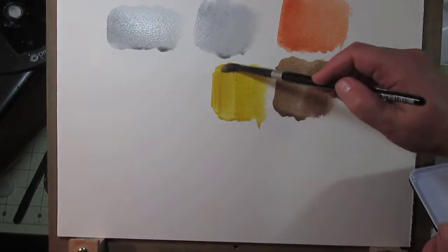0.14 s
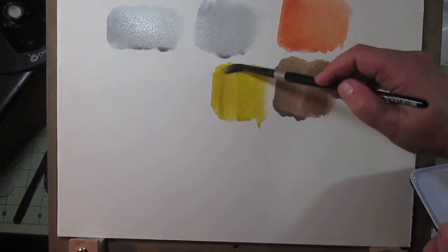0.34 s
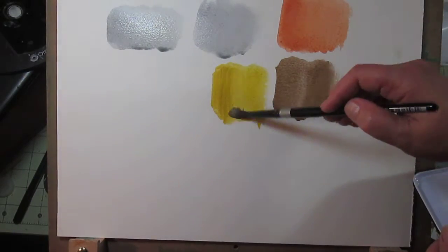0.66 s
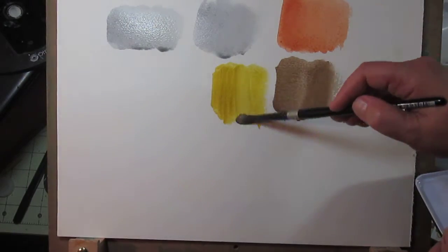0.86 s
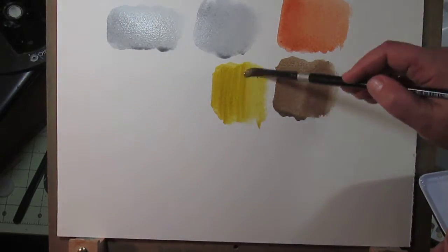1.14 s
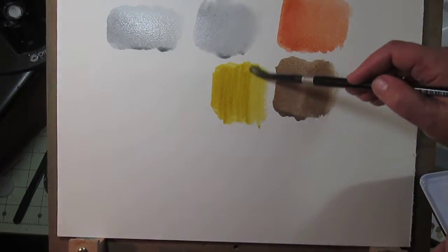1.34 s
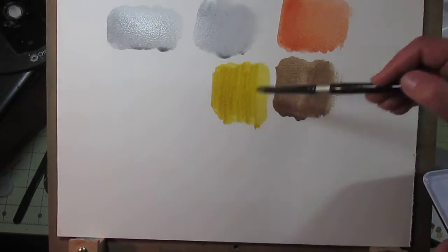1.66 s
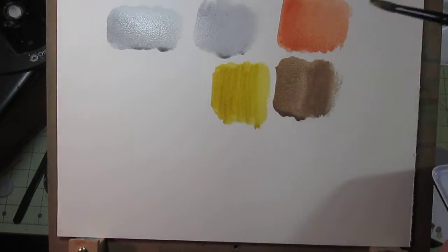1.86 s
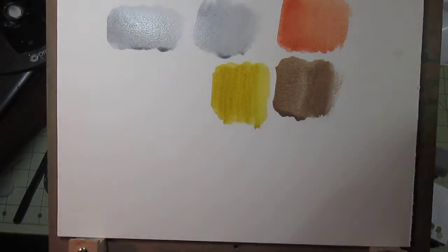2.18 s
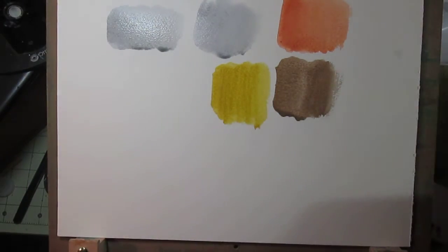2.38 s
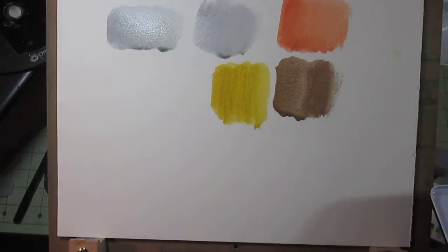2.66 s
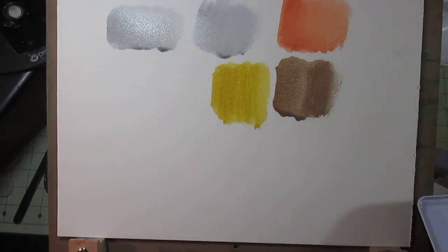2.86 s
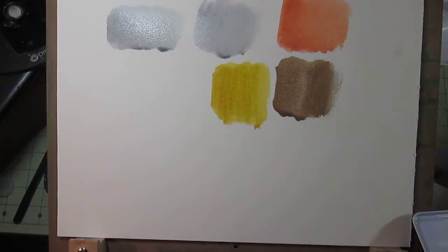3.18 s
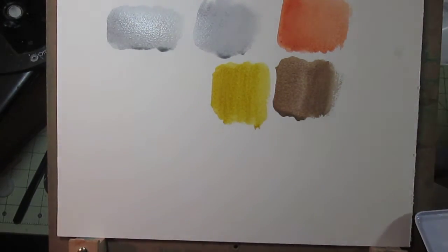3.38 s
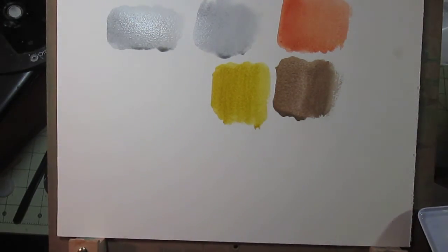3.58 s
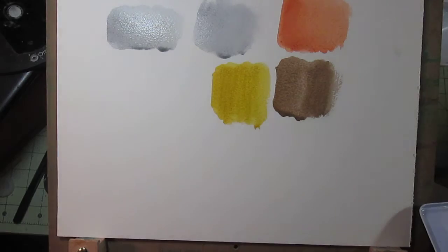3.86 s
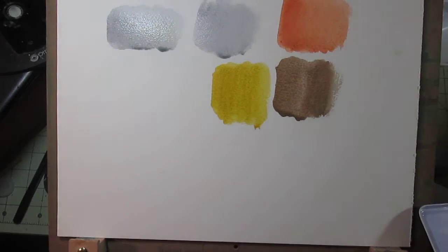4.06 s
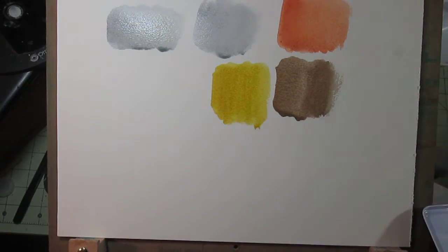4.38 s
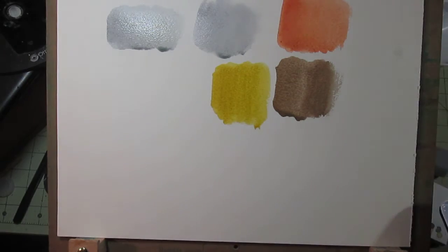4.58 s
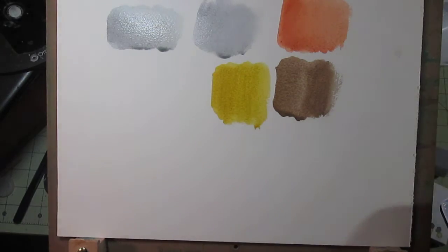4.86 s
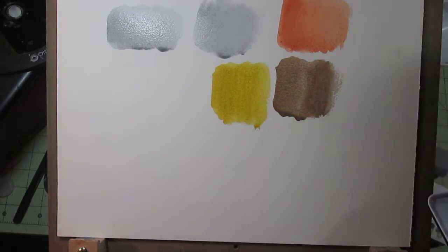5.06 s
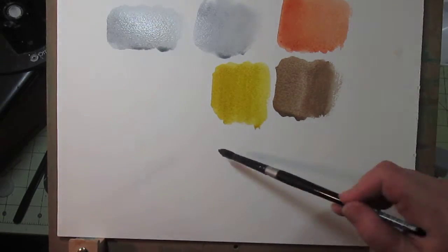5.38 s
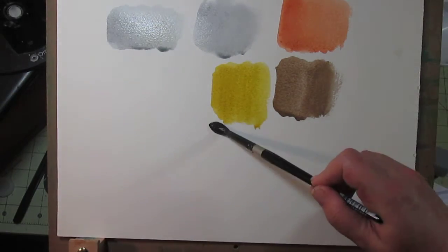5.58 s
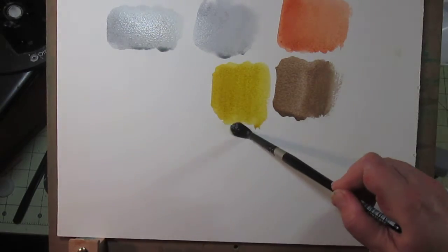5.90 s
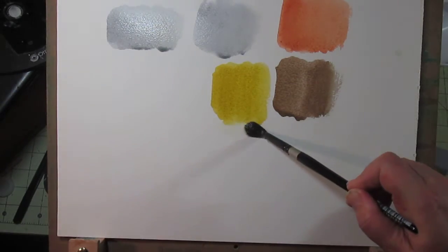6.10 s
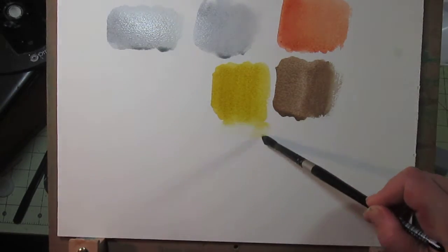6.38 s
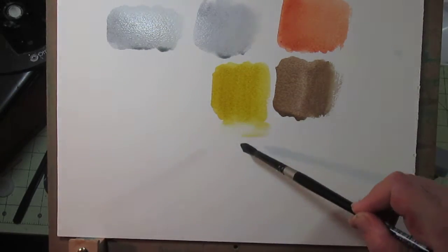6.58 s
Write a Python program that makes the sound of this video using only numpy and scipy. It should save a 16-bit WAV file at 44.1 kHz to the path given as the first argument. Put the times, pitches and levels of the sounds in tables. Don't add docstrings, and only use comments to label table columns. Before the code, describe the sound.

A small, quiet room heard through a camera microphone: soft air noise, low wavering machine hum around 50 Hz and a very faint, thin high whine throughout. From 0 to 1.05 s wet bristles brush paper in ten short, soft hisses, roughly one every tenth of a second, with one more flick at 1.6 s. Then only background until 2.9 s, when the brush plunges into a glass jar: a hard, bright clack at 2.94, a ringing clink at 3.18, a duller pair around 3.53 and 3.62, a low, longer knock at 3.93 and a light touch at 4.32. Between them, hollow gulps near 900-1000 Hz, rising bubble chirps and watery swirls, strongest around 3.2 and 3.6, with short room reflections. Tiny pops thin out until 5.2. Brief, faint motor buzzes occur occasionally. From 5.7 to 6.7 a hand slides dully on the board, with faint motor tone.

```python
import sys
import numpy as np
from scipy import signal
from scipy.fft import rfft, irfft, next_fast_len
from scipy.io import wavfile
from scipy.ndimage import uniform_filter1d

SR = 44100
rng = np.random.default_rng(int(sys.argv[2]) if len(sys.argv) > 2 else 0)


def waveform_to_disk(signal):
    frames = np.transpose(np.atleast_2d(signal))
    scaled = np.clip(frames, -1, 1) * 32767
    samples = np.round(scaled).astype(np.int16)
    wavfile.write(sys.argv[1], SR, samples)


def to_linear_factor(level_db):
    exponent = np.asarray(level_db, float) / 20
    return 10 ** exponent


N = 297409

# (time [s], crack level [dB], crack centre [Hz], crack t60 [s], ring level [dB])
KNOCKS = [
    (2.941, -4, 5260, 0.02, -35.5),
    (3.184, -15, 4020, 0.066, -32),
    (3.5303, -21, 3580, 0.064, -42),
    (3.6151, -9.5, 3200, 0.041, -37),
    (3.702, -32, 4000, 0.057, -42),
    (3.9324, -15, 2600, 0.084, -35),
    (4.317, -28, 3860, 0.042, -51),
]
# (time [s], level [dB], pitch
# [Hz], t60 [s])
CHINKS = [(2.9407, -20, 8120, 0.033), (2.9407, -17, 4800, 0.023), (2.9407, -38, 2696, 0.13),
          (2.9407, -27.5, 2210, 0.055), (3.1851, -22, 2605, 0.06), (3.189, -18.5, 2662, 0.05),
          (3.1851, -19, 2200, 0.02), (3.1851, -15.5, 4730, 0.011), (3.1851, -21, 6800, 0.011),
          (3.5294, -20, 2640, 0.032), (3.6152, -14.5, 3780, 0.025), (3.6152, -21.5, 568, 0.067),
          (3.618, -18, 947, 0.05), (3.704, -33.5, 2645, 0.036), (3.5294, -48.5, 3580, 0.33),
          (3.6152, -43.5, 3522, 0.33), (4.3166, -37, 3180, 0.023), (3.9319, -26.5, 3750, 0.034),
          (3.9319, -24, 706, 0.035), (3.9319, -33, 1133, 0.067), (3.9319, -53, 4320, 0.34),
          (3.9319, -41.5, 3565, 0.26), (3.97, -50.5, 424, 0.5), (3.9319, -49, 2900, 0.049),
          (4.3166, -50.5, 438, 0.23), (4.3166, -57, 899, 0.34), (2.9407, -24.5, 520, 0.038),
          (3.5294, -36, 549, 0.13)]
# (pitch [Hz], level [dB], t60 [s])
GLASS_MODES = [(440, -5, .3), (1505, 0, .4), (3112, -16, .3), (3521, -5, .27), (4330, -13, .25),
               (6218, -16, .2)]
THUD_OVER_RING_DB = 5.5
SNAP_DB, SNAP_T60_S = -16, 0.0028

# (time [s], peak level [dB], start pitch [Hz], swell [ms])
GULPS = [(2.934, -23, 930, 3.8), (2.992, -15, 850, 4.4), (3.056, -21, 937, 4.4), (3.065, -21, 895, 2.5),
         (3.174, -15.5, 852, 4.3), (3.258, -16.5, 990, 4.4), (3.286, -29, 990, 2.7),
         (3.315, -28.5, 853, 9.5), (3.344, -22.5, 843, 4.2), (3.445, -30.5, 910, 5), (3.467, -32, 886, 5.8),
         (3.501, -16.5, 985, 4.7), (3.512, -18.5, 1030, 7.5), (3.521, -19, 938, 6.1),
         (3.573, -33, 967, 7.8), (3.59, -18.5, 988, 5.1), (3.599, -30, 960, 14), (3.668, -25, 901, 5.9),
         (3.688, -28.5, 975, 1.9), (3.7, -39, 920, 6.8), (3.773, -31, 1115, 3.6), (3.982, -29, 1016, 6.5),
         (4.265, -28, 957, 5.8), (4.285, -35.5, 770, 4.6), (4.231, -43, 864, 4.5), (3.412, -49, 1010, 4.9)]
JAR_NOTE_HZ, PULL = 985, 0.82
# (time [s], peak level [dB], start pitch [Hz])
BLIPS = [(2.936, -24, 408), (2.99, -41, 544), (2.971, -35, 1567), (3.098, -28, 1640), (3.167, -39, 2610),
         (3.204, -26, 2545), (3.44, -35, 1390), (3.455, -39.5, 2060), (3.503, -35.5, 553),
         (3.508, -33, 2480), (3.576, -30.5, 1550), (3.588, -29.5, 550), (3.705, -34.5, 587),
         (3.798, -44.5, 2630), (3.49, -45, 2700), (3.901, -45, 1480), (3.974, -38, 2350),
         (4.082, -39, 1470), (4.131, -46, 2650), (4.268, -38.5, 1360), (4.269, -49, 2480)]
BLIP_GLIDE = 0.94
BLIP_SWELL_MS, BLIP_SHORTER = 6.1, 0.36
# (time [s], peak level [dB], start pitch [Hz], end pitch [Hz], swell [ms])
RISERS = [
    (2.953, -29, 383, 468, 15.4),
    (2.98, -26, 500, 900, 3.45),
    (3.0, -31, 1300, 1685, 8.6),
    (3.038, -43.5, 523, 810, 17),
    (3.08, -27.5, 1124, 1630, 7.6),
    (3.085, -29.5, 957, 1226, 7.1),
]
SWELL_POWER = 1.6

# (time [s], peak level [dB], pitch [Hz])
POPS = [(2.916, -40, 4370), (3.785, -53, 5750), (4.2577, -53, 4400), (4.6443, -58, 5170),
        (3.0395, -39.5, 12300), (3.0396, -43, 6600), (3.078, -54, 11000), (2.919, -56, 7300),
        (3.1742, -35, 5240), (3.1747, -43, 9000), (3.2713, -37.5, 6170), (3.3153, -53, 5600),
        (3.343, -37.5, 5640), (3.508, -46, 5300), (3.5814, -47, 12500), (3.594, -47, 7400),
        (3.763, -49.5, 5960), (3.824, -47, 7000), (3.908, -44, 7400), (4.1155, -51, 4810),
        (4.4428, -57, 7100), (4.4902, -56, 5010), (4.5276, -57, 5000), (4.671, -58, 5200),
        (4.7192, -57, 7450), (4.8494, -55, 3500), (4.9183, -53, 5160), (5.1864, -53.5, 6900)]
SETTLE_S = (3.95, 4.95)
SETTLE_DB, SETTLE_HZ = -60, 4970

# (time [s], level [dB])
STIR = [
    (2.935, -64),
    (2.991, -62),
    (3.13, -57),
    (3.195, -44),
    (3.42, -59),
    (3.6, -52),
    (3.86, -69),
    (4.1, -57),
    (4.4, -88),
]
# (time [s], level [dB], centre [Hz], t60 [s])
SLAPS = [(2.985, -42, 694, 0.037), (3.088, -67.5, 1970, 0.37), (3.168, -42, 1480, 0.033),
         (3.271, -69, 1800, 0.42), (3.441, -64, 1570, 0.48), (3.5, -48.5, 1297, 0.089),
         (3.576, -56, 1500, 0.056), (3.659, -52.5, 1300, 0.18), (3.76, -66, 1200, 0.081),
         (3.877, -67, 2860, .08), (3.901, -57, 1860, 0.058), (4.07, -64, 1900, 0.082),
         (4.083, -48.5, 1530, 0.031), (4.106, -72, 1200, 0.033), (4.13, -52.5, 1900, 0.087),
         (4.232, -56.5, 1590, 0.054), (4.266, -47, 1250, 0.085)]
# (centre [Hz], width [Hz], level [dB])
JAR_AIR = [(550, 97, -6.5), (960, 71, 5), (1410, 310, -5), (2600, 370, 2.5)]
SPRAY_DB, SPRAY_FOLLOWS = -65, 0.45

# (frequency [Hz], t60 [s])
ROOM = [(200, 0.37), (1500, 0.15), (6000, 0.16), (14000, 0.14)]

# (time of loudest moment [s], level [dB], length [s])
STROKES = [
    (.0, -59.5, 0.06),
    (.128, -64.5, 0.057),
    (.212, -60, 0.079),
    (.42, -58.5, 0.082),
    (.53, -63, 0.051),
    (.625, -56.5, 0.074),
    (.72, -67, 0.05),
    (.825, -59, 0.078),
    (.922, -62, 0.072),
    (1.025, -59.5, 0.057),
]
FLICK = (1.586, -56, 0.055)
# (frequency [Hz], density [dB per Hz])
BRISTLE = [(500, -40), (900, -3), (1500, 2), (2800, -6), (4800, 0), (7500, -6), (10000, -13), (15500, -23)]
STROKE_EDGE_DB = 15
CONTACT_DB, CONTACT_END_S = -80, 1.3
# (time [s], level [dB])
RUB = [
    (5.66, -70),
    (5.8, -57.5),
    (6.0, -61),
    (6.3, -64.5),
    (6.6, -61),
    (6.74, -75.5),
]

# (start [s], end [s], level [dB])
FOCUS = [
    (.0, 0.063, -78),
    (.96, 1.043, -76),
    (2.23, 2.32, -76.5),
    (3.837, 3.92, -75),
    (5.53, 5.586, -77),
    (5.755, 5.834, -75),
    (5.87, 5.9, -80),
]
MOTOR_HZ = 1376
MOTOR = [(1, -4), (2, 5), (4, 3), (6, 0), (7, 2), (8, -6)]
# (time [s], level [dB])
CREEP = [
    (5.68, -82),
    (5.704, -68.5),
    (5.818, -60),
    (5.866, -71),
    (5.968, -64),
    (6.312, -70),
    (6.442, -58.5),
    (6.666, -69),
    (6.68, -74),
]
# (pitch [Hz], rms level [dB])
WHINE = [(11793, -79), (11823, -92), (11853, -93), (11973, -97)]
# (centre [Hz], width [Hz])
NOTCHES = [(3931, 200), (7830, 80)]
TOP_HZ = 15830

# (frequency [Hz], density [dB per Hz])
AIR = [(60, -100), (90, -73.2), (130, -76.1), (200, -82.4), (500, -86.8), (800, -90.5), (1250, -93.4),
       (2000, -98.1), (4000, -103.9), (5500, -104.3), (7500, -106.3), (10000, -111.5), (13000, -117.5),
       (15800, -120.8)]
# (centre [Hz], width [Hz], level [dB])
HUM = [(31, 16, -53.5), (50.3, 26, -55), (67.4, 44, -65.5)]
DRONE_HZ, DRONE_DB = 54.5, -51.5


def knocks():
    out = np.zeros(N)
    t = np.arange(SR // 2) / SR
    for s, crack_db, hz, t60, ring_db in KNOCKS:
        dulling = lambda f: 0.32 + 0.73 / (1 + (f / 8600) ** 10)
        hiss = unit(filtered(rng.standard_normal(len(t)), lambda f: peak(f, hz, 0.64 * hz) * dulling(f)))
        two_stage_decay = to_linear_factor(-60 * t / (0.2 * t60)) + 1.34 * to_linear_factor(-60 * t / t60)
        crack = to_linear_factor(crack_db - 12.0) * hiss * two_stage_decay
        broad = unit(filtered(rng.standard_normal(len(t)), lambda f: peak(f, 4500, 9000)))
        snap = to_linear_factor(crack_db + SNAP_DB - 60 * t / SNAP_T60_S) * broad

        modes = sum(to_linear_factor(db - 60 * t / fade) * np.sin(2 * np.pi * c * t) for c, db, fade in GLASS_MODES)
        wobble = 1 + 0.34 * band(len(t), 11, 25)
        ring = to_linear_factor(ring_db) * wobble * modes * (1 - np.exp(-t / 0.0025))

        push = np.sin(2 * np.pi * 110 * t) + 0.23 * band(len(t), 280, 140)
        thud = to_linear_factor(ring_db + THUD_OVER_RING_DB - 60 * t / 0.12) * push * (1 - np.exp(-t / 0.0023))
        add(out, s, crack + snap + ring + thud)
    for s, db, hz, t60 in CHINKS:
        rattle = 1 + 0.55 * band(len(t), 200, 400) * (t60 < 0.2) * min(hz / 2500, 1)
        envelope = to_linear_factor(db + 7.5 - 60 * t / t60) * (1 - np.exp(-t / 0.00096))
        add(out, s, envelope * rattle * np.sin(2 * np.pi * hz * t))
    return out


def gulps():
    out = np.zeros(N)
    t = np.arange(SR // 8) / SR
    large = [(s, db, hz, hz + PULL * (JAR_NOTE_HZ - hz), ms) for s, db, hz, ms in GULPS]
    small = [(s, db, hz, BLIP_GLIDE * hz, BLIP_SWELL_MS * (hz / 1000) ** -BLIP_SHORTER)
             for s, db, hz in BLIPS]
    for s, db, start_hz, end_hz, ms in large + small + RISERS:
        swells = t / (ms * 1e-3)
        pitch = start_hz + (end_hz - start_hz) * np.minimum(swells / 2.5, 1.3)
        waver = 1 + 0.28 * band(len(t), 110, 200)
        envelope = to_linear_factor(db) * (swells * np.exp(1 - swells)) ** SWELL_POWER
        add(out, s, envelope * waver * np.sin(2 * np.pi * np.cumsum(pitch) / SR))
    return out


def pops():
    out = np.zeros(N)
    t = np.arange(SR // 20) / SR
    foam = []
    for when, loudness, size in rng.random((34, 3)):
        s = np.interp(when, [0, 1], SETTLE_S)
        foam.append((s, SETTLE_DB + 6.5 * (loudness - 0.5), SETTLE_HZ * np.exp(0.5 * (size - 0.5))))
    for s, db, hz in POPS + foam:
        add(out, s, to_linear_factor(db - 1 - 60 * t / 0.044) * band(len(t), hz, 0.19 * hz))
    return out


def slosh():
    stir_db, = curves(STIR)
    bubbles = grains(900, hz=1100, spread=1.2, cycles=4, size_db=14)
    wet = to_linear_factor(stir_db + 13.5) * bubbles
    t = np.arange(SR // 6) / SR
    for s, db, hz, t60 in SLAPS:
        envelope = to_linear_factor(db + 22.5 - 60 * t / t60) * (1 - np.exp(-t / 0.00103))
        add(wet, s, envelope * band(len(t), hz, 0.96 * hz))

    def cavity(f):
        direct = 0.24 / (1 + (f / 3300) ** 4)
        return direct + sum((-1) ** k * to_linear_factor(db) * peak(f, c, w) for k, (c, w, db) in enumerate(JAR_AIR))

    spray_db = np.where(stir_db > -99, SPRAY_DB + SPRAY_FOLLOWS * (stir_db + 50), -140)
    spray = to_linear_factor(spray_db + 5.0) * grains(1266, hz=4900, spread=0.85, cycles=1.1, size_db=6)
    return filtered(wet, cavity) + spray


def grains(per_s, hz, spread, cycles, size_db):
    first, last = STIR[0][0], STIR[-1][0]
    draw = rng.random((int(per_s * (last - first)), 4))
    pitch = hz * np.exp(spread * (draw[:, 1:2] + draw[:, 2:3] - 1))
    turns = pitch * np.arange(700) / SR
    life = turns / cycles
    wave = life * np.exp(-life) * np.sin(2 * np.pi * turns * (1 + 0.018 * life))
    wave = wave * to_linear_factor(size_db * draw[:, 3:] ** 2)
    start = ((first + draw[:, :1] * (last - first)) * SR).astype(int)
    at = start + np.arange(700)
    out = np.bincount(at.ravel(), wave.ravel(), N)[:N]
    return out / np.sqrt(np.sum(out ** 2) / (SR * (last - first)))


def room(x):
    out, hop = np.zeros(N), SR // 5
    for start in range(int(2.8 * SR), int(5.4 * SR), hop):
        hz, t, z = signal.stft(rng.standard_normal(SR // 2), SR, nperseg=256)
        decay = to_linear_factor(-60 * t / along(ROOM, hz)[:, None])
        tail = signal.istft(z * decay, SR, nperseg=256)[1]
        answer = signal.fftconvolve(x[start:start + hop], tail / np.linalg.norm(tail))
        add(out, start / SR + 0.004, answer)
    return out


def brush():
    t = np.arange(N) / SR
    level = CONTACT = to_linear_factor(CONTACT_DB) * (t < CONTACT_END_S)
    for s, db, length in [*STROKES, FLICK]:
        level = level + to_linear_factor(db - STROKE_EDGE_DB * np.abs(2 * (t - s) / length) ** 1.7)
    hiss = unit(filtered(rng.standard_normal(N), lambda f: to_linear_factor(along(BRISTLE, f))))
    hiss = to_linear_factor(2.5) * hiss
    hand = to_linear_factor(curves(RUB)[0]) * band(N, 520, 1250)
    return level * hiss + hand


def camera():
    t = np.arange(N) / SR
    gate = sum(to_linear_factor(db) * ((t > a) & (t < b)) for a, b, db in FOCUS)
    teeth = sum(to_linear_factor(db) * np.sin(2 * np.pi * k * MOTOR_HZ * t) for k, db in MOTOR)
    creep = to_linear_factor(curves(CREEP)[0]) * band(N, 1.016 * MOTOR_HZ, 120)
    whine = sum(to_linear_factor(db) * np.sqrt(2) * np.sin(2 * np.pi * hz * t) for hz, db in WHINE)
    return uniform_filter1d(gate, size=300) * teeth + creep + whine


def background():
    air = filtered(rng.standard_normal(N), lambda f: to_linear_factor(along(AIR, f)) * np.sqrt(SR / 2))
    speed = DRONE_HZ * (1 + 0.051 * band(N, 1.9, 5.9))
    drone = to_linear_factor(DRONE_DB) * np.sqrt(2) * np.sin(2 * np.pi * np.cumsum(speed) / SR)
    hum = sum(to_linear_factor(db) * band(N, c, w) for c, w, db in HUM)
    return air + drone + hum


def unit(x):
    return x / np.sqrt(np.mean(x ** 2) + 1e-20)


def along(points, hz):
    f, v = np.transpose(points)
    return np.interp(np.log(hz + 1), np.log(f + 1), v)


def curves(rows):
    s, *cols = np.transpose(rows)
    return [np.interp(np.arange(N) / SR, s, c, left=-140, right=-140) for c in cols]


def filtered(x, response):
    m = next_fast_len(len(x) + SR // 2)
    return irfft(rfft(x, m) * response(np.fft.rfftfreq(m, 1 / SR)), m)[:len(x)]


def peak(f, hz, width):
    return 1j * f * width / (hz * hz - f * f + 1j * f * width + 1e-9)


def band(n, hz, width):
    return unit(filtered(rng.standard_normal(n), lambda f: peak(f, hz, width) ** 2))


def add(track, s, sound):
    part = track[round(s * SR):][:len(sound)]
    part += sound[:len(part)]


def scene():
    jar = knocks() + gulps() + pops() + slosh()
    in_room = jar + to_linear_factor(-7) * room(jar)
    heard = filtered(in_room, lambda f: 1 / (1 + (f / 13500) ** 8))
    return (heard + brush() + camera() + background())[None]


def low_pass(x):
    return signal.sosfilt(signal.butter(12, 16580, fs=SR, output="sos"), x)


def record(dry):
    def shape(f):
        return np.prod([1 - peak(f, c, w) for c, w in NOTCHES], axis=0) * (f < TOP_HZ)

    mix = filtered(dry[0], shape)[None]
    return low_pass(mix)


dry = scene()
out = record(dry)
waveform_to_disk(out)
```